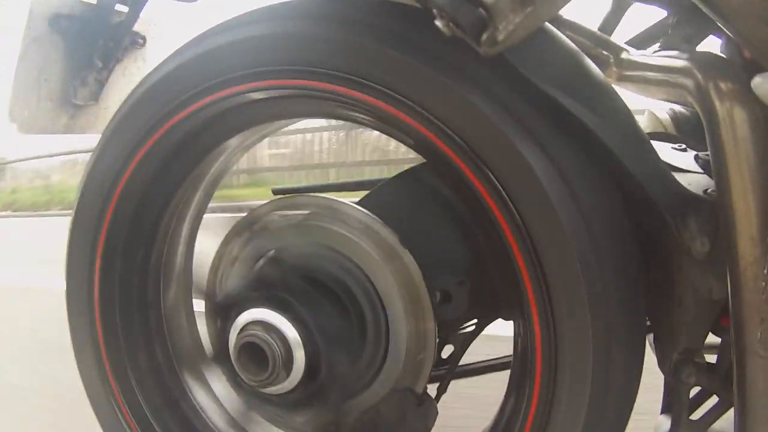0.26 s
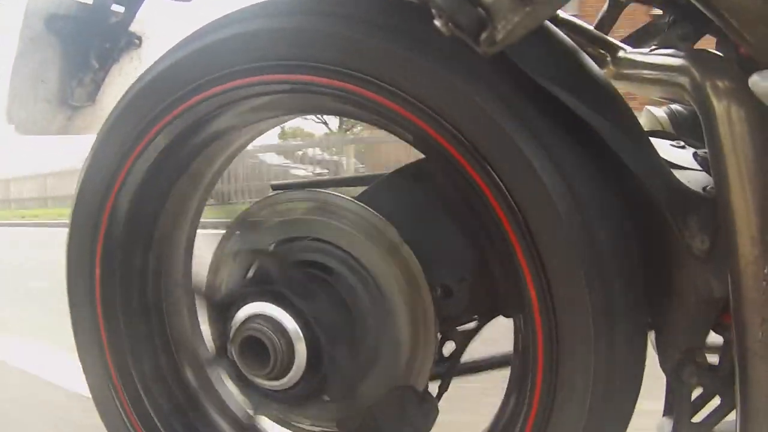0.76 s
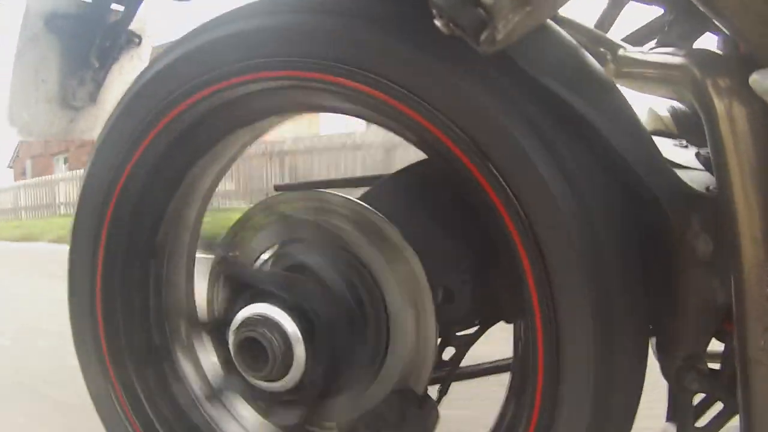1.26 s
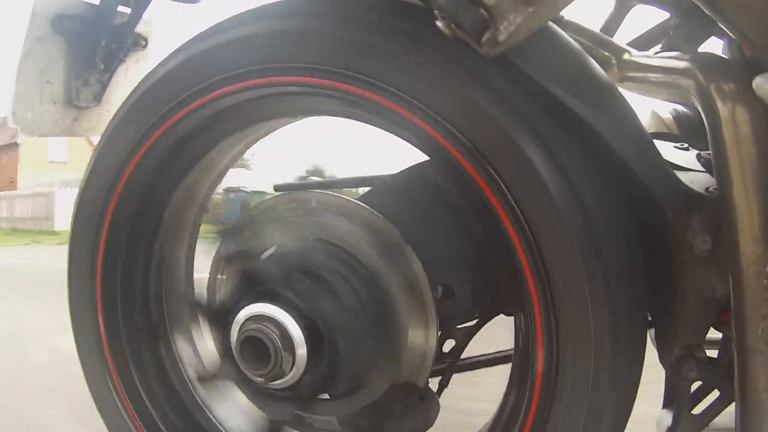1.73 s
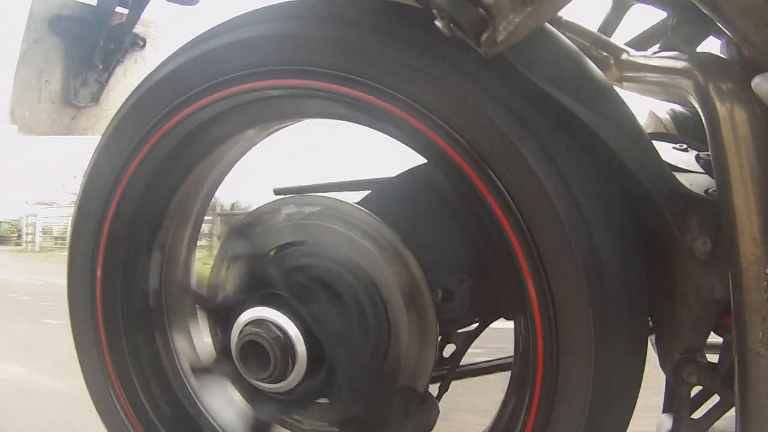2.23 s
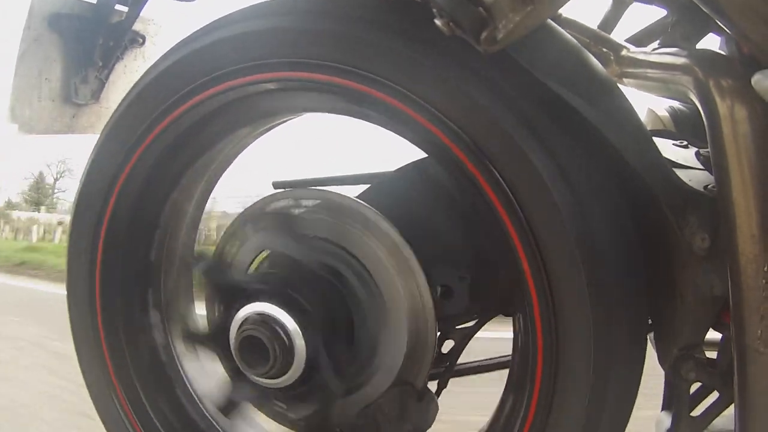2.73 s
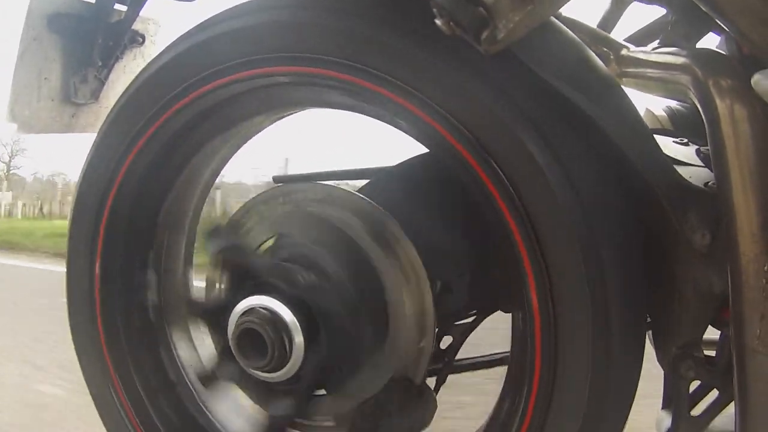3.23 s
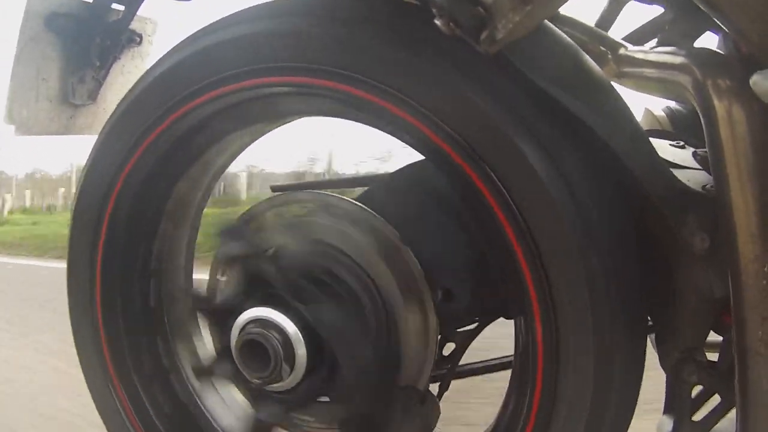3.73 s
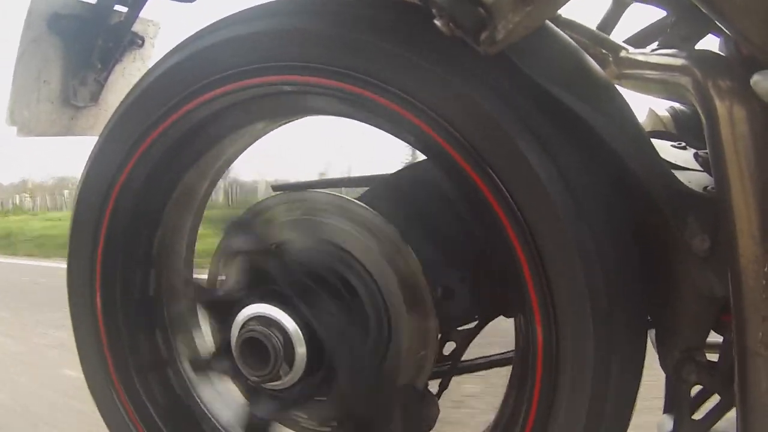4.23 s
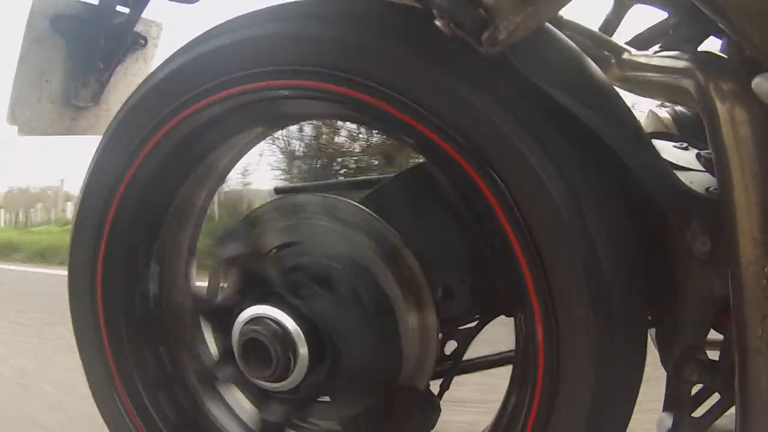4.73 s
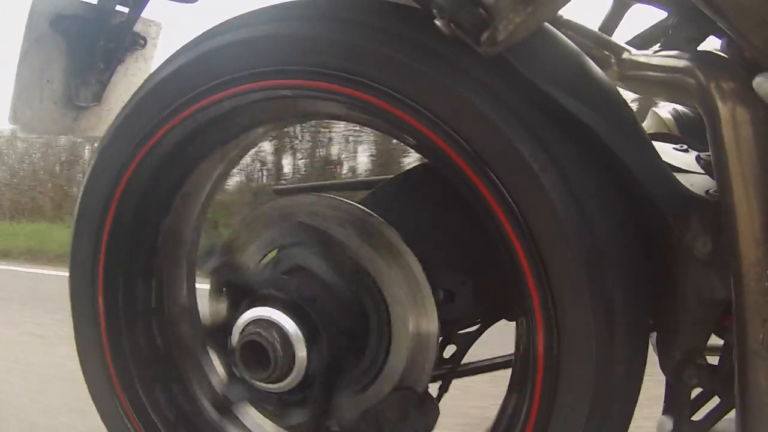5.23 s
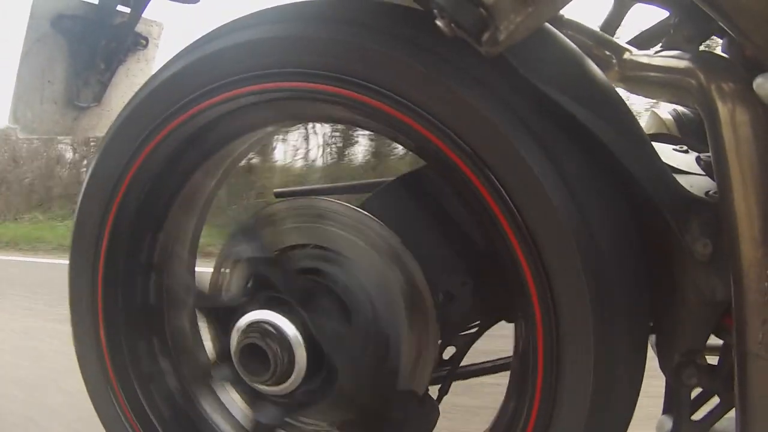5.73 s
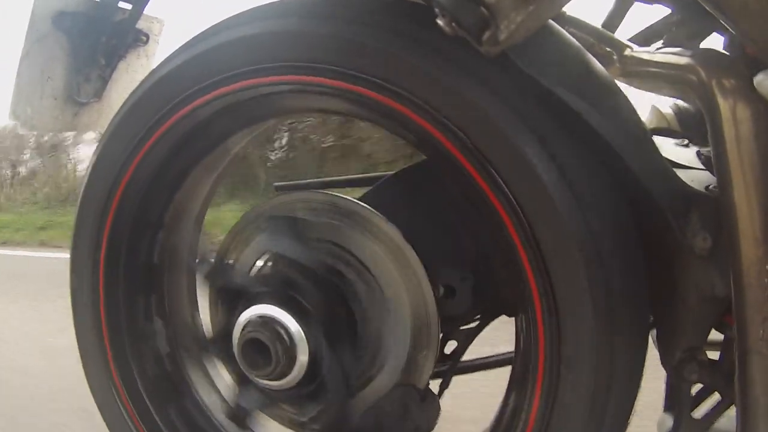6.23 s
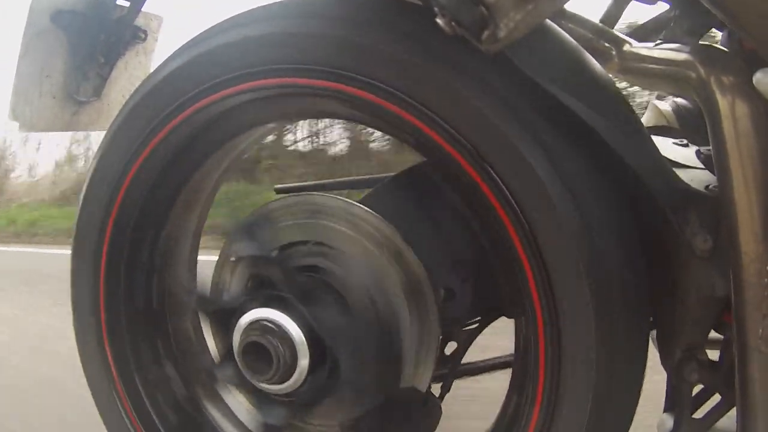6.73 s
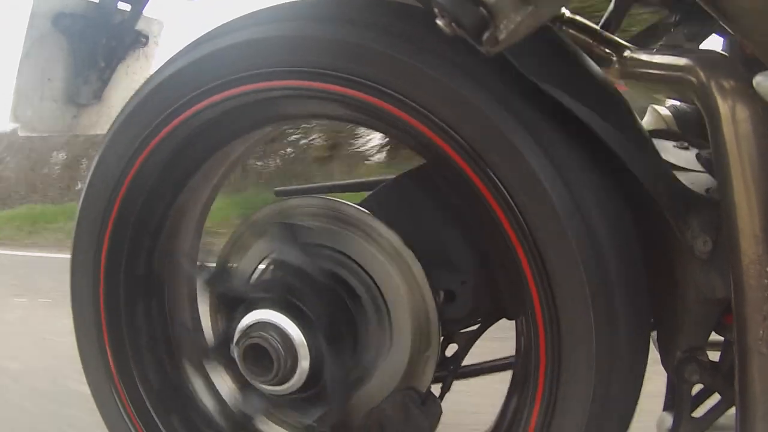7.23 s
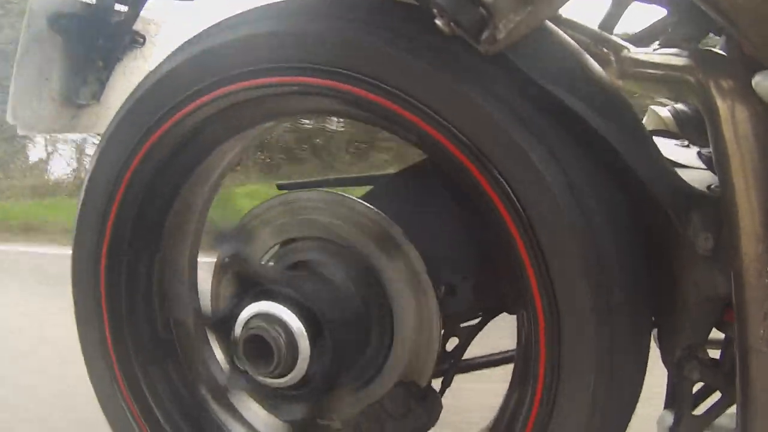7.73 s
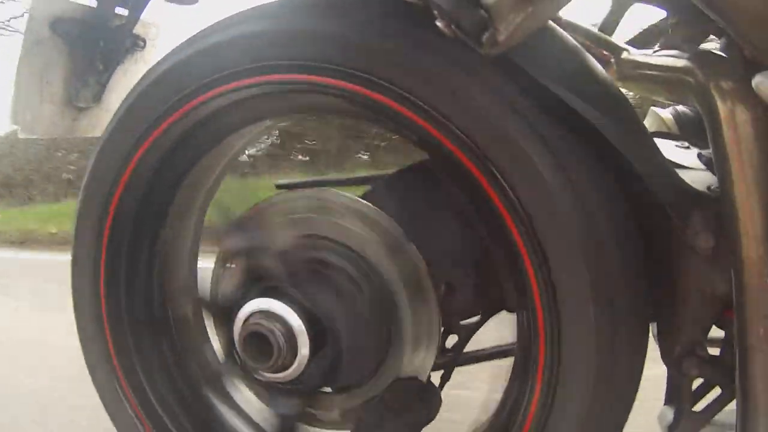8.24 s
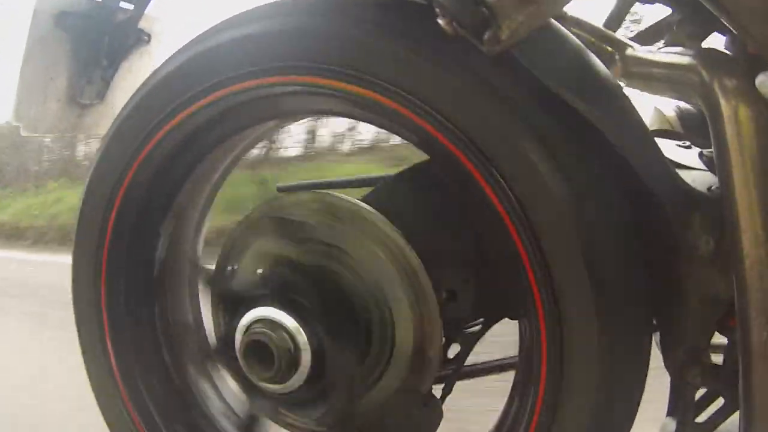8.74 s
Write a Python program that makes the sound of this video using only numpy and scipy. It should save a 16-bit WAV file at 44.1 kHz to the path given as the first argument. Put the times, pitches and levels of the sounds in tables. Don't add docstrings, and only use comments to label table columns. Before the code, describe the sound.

A motorcycle's raspy three-cylinder exhaust pops and bangs off throttle, pulls hard, crackles through a long volley of backfires, pulls again, then ends banging.

```python
import sys
import numpy as np
from scipy import signal
from scipy.fft import rfft, irfft
from scipy.io import wavfile

SR = 44100
rng = np.random.default_rng(int(sys.argv[2]) if len(sys.argv) > 2 else 0)


def put_to_file(sound):
    columns = np.atleast_2d(sound).T
    safe = np.clip(columns, -1, 1)
    whole_steps = np.round(safe * 32767)
    wavfile.write(sys.argv[1], SR, whole_steps.astype(np.int16))


def natural_amplitude(level_db):
    exponent = np.asarray(level_db, float) / 20
    return 10 ** exponent


N = 395577

MID_PER_S = 105


def in_time(rows):
    start_s, value = np.transpose(rows)
    return np.interp(np.arange(N) / SR, start_s, value)


def butter(x, hz, kind, order=2):
    return signal.sosfilt(signal.butter(order, hz, kind, fs=SR, output="sos"), x + 1e-18)


def drift(rate_hz):
    slow = butter(rng.standard_normal(N + SR), rate_hz, "low")[SR:]
    return slow / slow.std()


def resonance_db(hz, centre_hz, width_hz, peak_db):
    return peak_db / (1 + (2 * (hz - centre_hz) / width_hz) ** 2)


def engine_levels(opening, per_s, rush_db):
    # (dB re rush, for lift dB re pulse; dB per extra firing a second)
    pulse_shut, lift_shut, boom_shut = (-4.5, 0.12), (0.99, -0.11), (12.4, -0.071)
    drone_shut, whine_shut = (9.8, 0.57), (-14.5, 0.054)
    # (dB, dB per extra firing a second, dB gained at full load)
    pulse_open, lift_open, boom_open = (-27, -0.34, 1.23), (7.1, 0.39, 2.5), (-33, 0.03, 5.7)
    drone_open, whine_open = (-16, 0.23, 0.84), (-43, 0.022, 9.8)
    full_fire = 0.25
    firing = np.clip(opening / full_fire, 0, 1)
    load = np.clip((opening - full_fire) / (1 - full_fire), 0, 1)
    faster = per_s - MID_PER_S

    def shut(law):
        return law[0] + law[1] * faster

    def pulling(law):
        return law[0] + law[1] * faster + law[2] * load

    def blend(law_shut, law_open):
        return (1 - firing) * (rush_db + shut(law_shut)) + firing * pulling(law_open)

    swell_db = load * resonance_db(3 * per_s, 347.4, 22.4, 13.5)
    pulse_db = blend(pulse_shut, pulse_open) + swell_db
    lift_db = (1 - firing) * shut(lift_shut) + firing * pulling(lift_open) - swell_db
    drone = (1 - firing) * natural_amplitude(rush_db + shut(drone_shut)) - firing * natural_amplitude(pulling(drone_open))
    drone_db = 20 * np.log10(np.abs(drone) + 0.031)
    whine_db = blend(whine_shut, whine_open) - load * 0.3 * np.maximum(per_s * 32 / 3 - 1208, 0)
    return np.maximum(load, 0.033), pulse_db, lift_db, blend(boom_shut, boom_open), drone_db, whine_db


def exhaust(turns, per_s, throttle, pulse_db, lift_db, drone_db):
    cylinder_db = [1.2, -1.8, 0.6]
    # pitch_hz, level_db
    order_colour = [(280, 2.5), (380, -1.5), (460, -5), (570, -11), (680, -13.5), (780, -24.5),
                    (900, -19.5), (1100, -45)]
    # centre_hz, width_hz, level_db
    side_branches = [(475.4, 13, -8.5), (563, 35, 4), (586.3, 16.6, -18), (655, 13, -6), (696, 37, 2),
                     (830, 33, 3)]
    count = int(turns[-1]) + 2
    firings = np.arange(count)
    chance = np.interp(turns, firings, rng.standard_normal(count))
    uneven_db = np.interp(turns, firings, np.resize(cylinder_db, count))
    uneven_db = uneven_db + (2.8 - 2.1 * np.minimum(2 * throttle, 1)) * chance
    phase, lead = 2 * np.pi * turns, 0.3
    upper = 0
    for order in range(3, 11):
        order_hz = order * per_s
        echo_db = lift_db * (order > 3) * 4 / order
        for branch in side_branches:
            echo_db = echo_db + resonance_db(order_hz, *branch)
        colour_db = np.interp(order_hz, *np.transpose(order_colour))
        upper = upper + natural_amplitude(colour_db + echo_db) * np.cos(order * phase + lead)
    drone = natural_amplitude(drone_db + 0.055 * uneven_db) * np.cos(2 * phase + lead)
    return -natural_amplitude(pulse_db + uneven_db) * upper - drone


def pumping_boom(turns, boom_db):
    return natural_amplitude(boom_db + 0.8 * drift(12) + 1.5 * drift(70)) * np.cos(2 * np.pi * turns - 1.4)


def gear_whine(turns, whine_db):
    phase = 2 * np.pi * turns * 32 / 3
    return natural_amplitude(whine_db + 2.2 * drift(25)) * np.sin(phase + 0.35 * drift(20))


def half_mesh(turns, per_s, load, rush_db):
    # dB re rush, dB per extra firing a second, dB gained at full load
    mesh_law = (-7.5, -0.5, 3.5)
    level_db = rush_db + mesh_law[0] + mesh_law[1] * (per_s - MID_PER_S) + mesh_law[2] * load
    level_db = level_db + 4.4 * drift(12)
    return natural_amplitude(level_db) * np.sin(2 * np.pi * turns * 16 / 3 + 0.4 * drift(15))


def backfire_rows():
    # start_s, heard peak_db, crack_db re peak, push_db of gain pushed down
    bangs = [(0.379, 0, -25, 19), (0.447, -3.5, -29, 10), (0.5876, 0.2, -27, 15.5),
             (0.7632, -0.5, -30, 12.5), (0.876, -1.7, -29, 13.5), (0.9693, -1.5, -21, 13.5),
             (1.0037, -5.5, -28, 11.5), (1.163, -10, -34, 8), (4.1749, -6.5, -38, 11.5),
             (4.2825, -2.7, -45, 15.5), (4.4166, 0, -25, 19), (4.5433, 0, -30, 17), (4.617, -8, -39, 2.0),
             (4.6896, -2.0, -50, 12), (4.8855, 2, -19, 17), (4.9313, -8, -37, 8), (5.0816, 0, -29, 15),
             (5.1873, -0.3, -31, 16.5), (5.235, -6, -44, 13), (5.457, -6, -37, 13.5),
             (5.6258, 1, -24, 15.5), (5.675, -6.5, -36, 13.5), (5.8022, 0.5, -38, 16),
             (5.9536, 3.5, -23, 19), (5.9949, -4, -25.5, 16.5), (6.0344, -4, -35, 14.5),
             (6.0776, -4, -31, 15), (6.1478, -0.5, -26.5, 16.5), (6.2295, -2.7, -29, 12.5),
             (8.9109, 1.5, -26, 25)]
    # start_s, heard peak_db,
    # push_db of gain pushed down
    puffs = [(0.2408, -9, -1.5), (0.6808, -11, 8.5), (1.1695, -10, 4), (1.3476, -13.5, 6.5),
             (1.4397, -11.5, 3.5), (1.5155, -6.5, 15.5), (1.615, -18, 2.5), (1.7477, -11.5, 3),
             (1.844, -9, 3.5), (1.8982, -15, 1.5), (3.812, -19, -9), (3.845, -18, -1), (4.069, -7.5, 1),
             (4.81, -12.5, 3.5), (5.0643, -12, 6), (5.31, -12, 9), (5.4185, -7.5, 14.5), (5.8865, -25, 7),
             (6.2718, -16.5, 9.5), (6.3608, -14, 4.5), (6.524, -11, 4), (8.2249, -5, 9),
             (8.3552, -6.5, 10.5), (8.476, -17, 1), (8.6146, -6, 14.5), (8.767, -12, 7.5),
             (8.7777, -8, 3.5), (8.9552, -18, .1)]
    sharp = [(s, peak_db, crack_db, -13.5, push_db) for s, peak_db, crack_db, push_db in bangs]
    dull = [(s, peak_db, -27, -7.5, push_db) for s, peak_db, push_db in puffs]
    return sharp + dull


def gain_db():
    recovery_s, attack_s = 0.094, 0.006
    t, pushed = np.arange(N) / SR, np.full(N, -99.)
    for start_s, *_, push_db in backfire_rows():
        pushed[round((start_s - 0.0015) * SR)] = np.log(max(push_db, 0.1)) + start_s / recovery_s
    shortfall_db = np.exp(np.maximum.accumulate(pushed) - t / recovery_s)
    r = np.exp(-1 / (attack_s * SR))
    return -signal.lfilter([1 - r], [1, -r], shortfall_db)


def pipe(clicks, soft_hz, low_hz):
    lag = round(0.00417 * SR)
    spike = -butter(clicks, soft_hz, "low", order=3)
    out = spike.copy()
    for trip in range(3):
        delayed = np.concatenate([np.zeros(lag), spike[:-lag]])
        spike = 0.44 * butter(delayed, 840, "low")
        out += spike
    return butter(out, low_hz, "high")


def silencer_thump(pushes):
    pitch_hz, width_hz = 285, 75
    r, w = np.exp(-np.pi * width_hz / SR), 2 * np.pi * pitch_hz / SR
    return signal.lfilter([0, np.sin(w)], [1, -2 * r * np.cos(w), r * r], butter(pushes, [140, 700], "band"))


def backfires():
    start_s, peak_db, crack_db, thump_db, _ = np.transpose(backfire_rows())
    at = (start_s * SR).round().astype(int)
    true_db = peak_db - gain_db()[at]
    sharp = np.clip(-(thump_db + 7) / 9, 0.1, 1)
    clicks, edges, bursts, pushes = np.zeros((4, N))
    clicks[at - 14] = sharp * natural_amplitude(true_db + 27)
    clicks[at - 64] = -0.25 * clicks[at - 14]
    clicks[at + 51] = rng.uniform(0.2, 0.5, len(at)) * clicks[at - 14]
    edges[at - 6] = natural_amplitude(true_db + crack_db + 30.5)
    bursts[at - 10] = natural_amplitude(true_db + crack_db + 5.5)
    pushes[at - 100] = (1.1 - 0.8 * sharp) * natural_amplitude(true_db + thump_db + 13)
    fading = signal.lfilter([1], [1, -np.exp(-1 / (0.0011 * SR))], bursts + 1e-18)
    crack = butter(butter(fading * rng.standard_normal(N), 1000, "high"), 3800, "low")
    spikes = natural_amplitude(1.0) * pipe(clicks, soft_hz=742, low_hz=131)
    shock = pipe(edges, soft_hz=2120, low_hz=450)
    return spikes + natural_amplitude(-0.1) * silencer_thump(pushes) + crack + shock


def coloured(x, spectrum):
    # centre_hz, width_hz, level_db
    housing = [(510, 3.8, 10.5), (731, 28, 7), (886, 23, 2), (1000, 17, 7), (1297, 36, 3.5),
               (1493, 23, -14.5), (1921, 24, 10), (2050, 32, 1.5), (2428, 63, 5.5), (2857, 344, -7.5),
               (3130, 31, 6), (3176, 146, 6), (3422, 24, 8.5), (3513, 346, 11), (3660, 79, -2.5),
               (4950, 300, 4.5), (6990, 255, 10), (8240, 190, 5.5), (9280, 270, 6.5), (11640, 590, 4.5)]
    hz = np.arange(N // 2 + 1) * SR / N + 1
    curve_hz, curve_db = np.transpose(spectrum)
    level_db = np.interp(np.log(hz), np.log(curve_hz), curve_db)
    for mode in housing:
        level_db += resonance_db(hz, *mode)
    return irfft(rfft(x) * natural_amplitude(level_db), N)


def rush(turns, throttle, rush_db):
    # pitch_hz, level_db per Hz
    rush_spectrum = [(30, -6), (70, 0), (150, 2), (300, 15), (700, 3.5), (1400, -4.5), (2400, -4),
                     (4100, -17.5), (6000, -23), (9000, -37.5), (13000, -35), (15600, -48)]
    phase, closed = 2 * np.pi * turns, 1 - throttle
    throb = 1 + 0.1 * np.cos(phase - 0.6)
    flutter = natural_amplitude(0.22 * drift(30) + 0.5 * drift(130))
    noise = coloured(rng.standard_normal(N) * throb * flutter, rush_spectrum)
    hiss = butter(noise, 7000, "high") * natural_amplitude(4.2 * np.tanh(drift(14.5))) * (0.38 + 1.0 * throttle)
    lumps = natural_amplitude(2.8 * drift(25)) * (1 + 0.5 * np.cos(phase - 1.4))
    rumble = butter(noise, 480, "low", order=1) * lumps * 0.63 * closed
    buffeting = butter(noise, 134, "low") * lumps * 2.0 * closed * natural_amplitude(-0.8 * (rush_db + 29.5))
    unit = butter(noise, [1500, 6000], "band").std()
    return natural_amplitude(rush_db - 3.0) * (noise + hiss + rumble + buffeting) / unit


def scene():
    # start_s, opening (0-1)
    throttle_curve = [(1.5, 0.08), (1.7, 0.22), (1.88, 0.22), (2.1, 0.81), (2.7, 1.0), (3.58, 0.95),
                      (3.68, 0.67), (3.735, 0.74), (3.75, .25), (3.795, 0.03), (6.2, 0.05), (6.4, 0.21),
                      (6.6, 0.21), (6.9, 0.76), (7.95, 0.93), (8.03, 0.22), (8.08, 0)]
    # start_s, firings per second
    speed_curve = [(0.05, 124.3), (1.1, 114.1), (1.7, 111), (2.3, 110.5), (2.7, 112.3), (3.1, 115.0),
                   (3.5, 117.1), (3.7, 116.9), (3.82, 114.6), (4.15, 113.5), (4.7, 108.4), (5.9, 99.3),
                   (6.4, 96.6), (6.9, 95.3), (7.3, 94.9), (7.7, 95.2), (8.1, 93.6), (8.9, 89.6)]
    # start_s, level_db
    rolling_curve = [(0.05, -26.5), (.36, -26.5), (.45, -30.5), (1.3, -30.5), (1.55, -28.5), (2.1, -31),
                     (2.7, -29.5), (3.3, -32), (3.72, -29.5), (3.82, -27.5), (4.2, -26.5), (4.7, -32.5),
                     (5.6, -30), (6.4, -33), (7.95, -28.5), (8.1, -26.5), (8.7, -25.5), (8.9, -28)]
    opening, per_s, rush_db = in_time(throttle_curve), in_time(speed_curve), in_time(rolling_curve)
    load, pulse_db, lift_db, boom_db, drone_db, whine_db = engine_levels(opening, per_s, rush_db)
    turns = np.cumsum(per_s * (1 + 0.0015 * drift(8))) / SR
    engine = exhaust(turns, per_s, load, pulse_db, lift_db, drone_db) + pumping_boom(turns, boom_db)
    gears = gear_whine(turns, whine_db) + half_mesh(turns, per_s, load, rush_db)
    return (engine + backfires() + gears + rush(turns, load, rush_db))[None]


def roll_off(x):
    return signal.sosfilt(signal.butter(12, 15710, fs=SR, output="sos"), x)


def record(dry):
    heard = butter(dry, 48, "high") * natural_amplitude(gain_db())
    return roll_off(np.clip(heard, -0.99, 0.99))


dry = scene()
out = record(dry)
put_to_file(out)
```